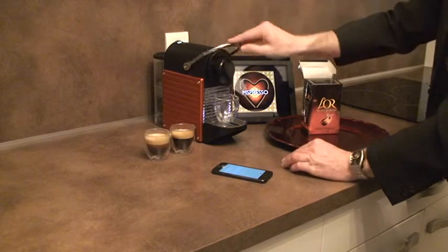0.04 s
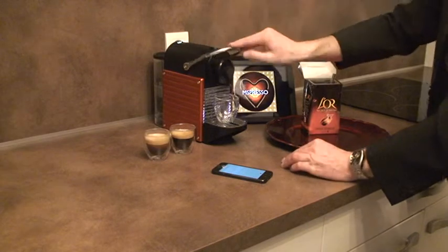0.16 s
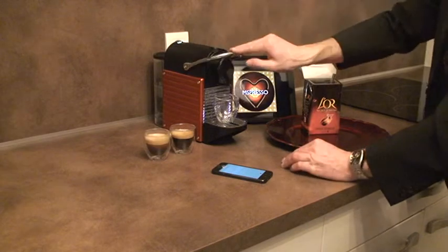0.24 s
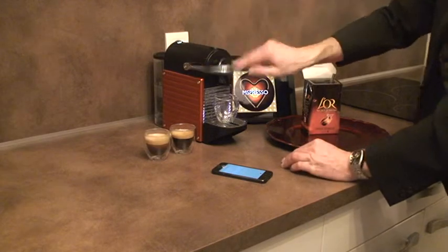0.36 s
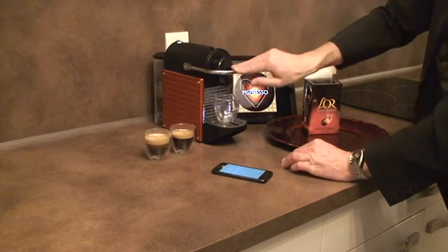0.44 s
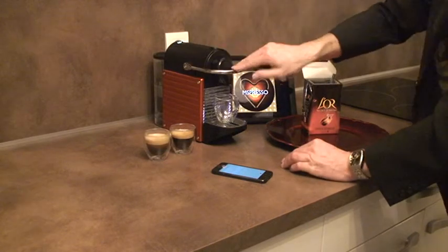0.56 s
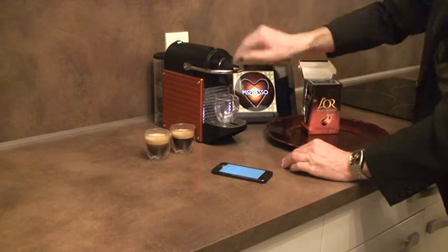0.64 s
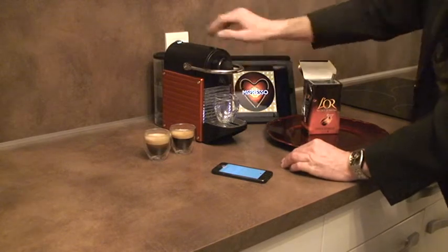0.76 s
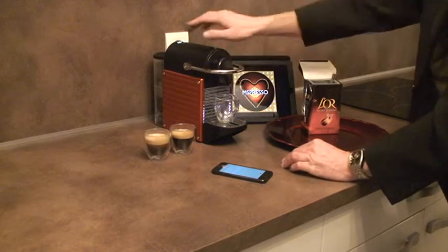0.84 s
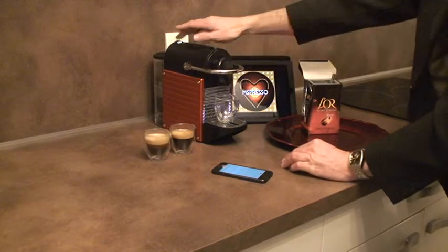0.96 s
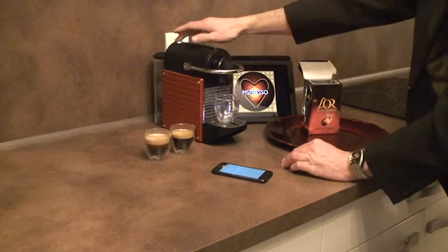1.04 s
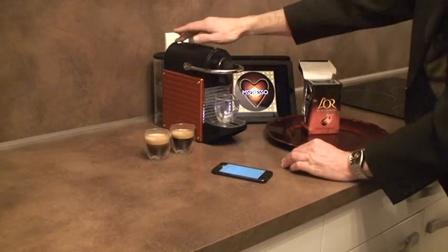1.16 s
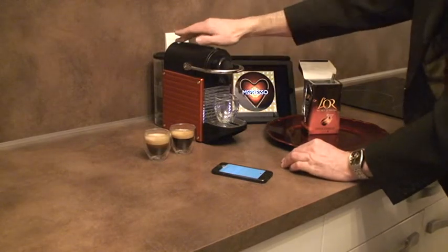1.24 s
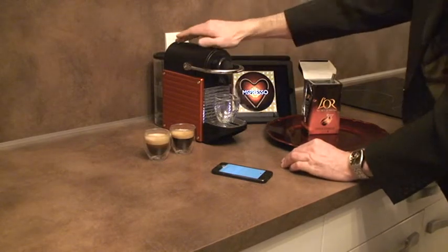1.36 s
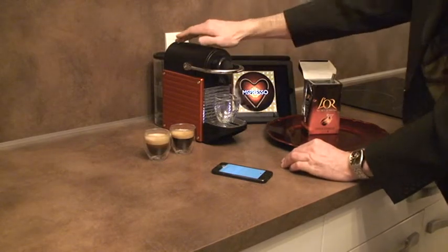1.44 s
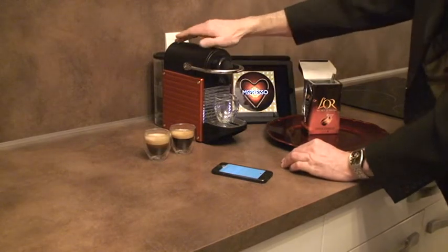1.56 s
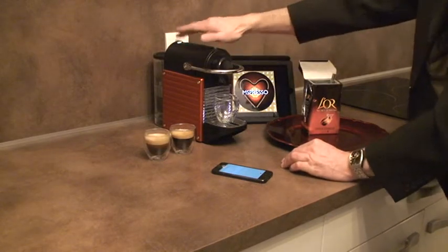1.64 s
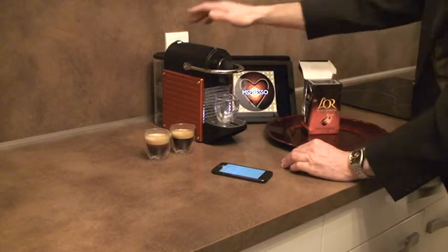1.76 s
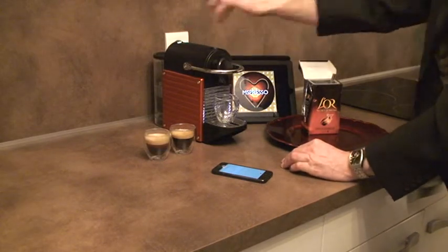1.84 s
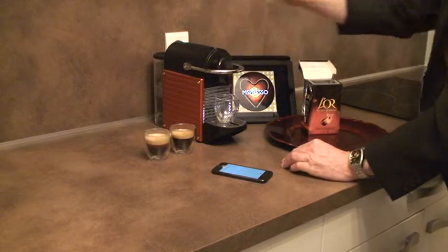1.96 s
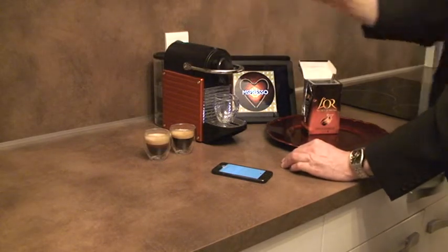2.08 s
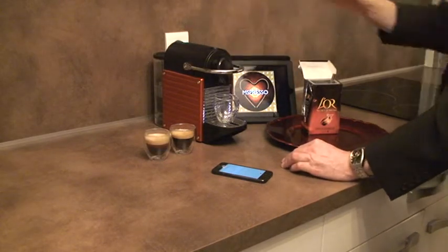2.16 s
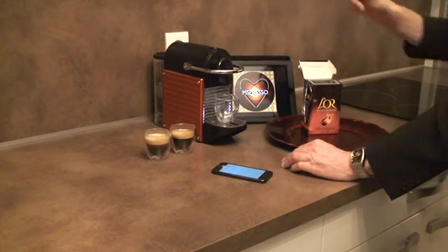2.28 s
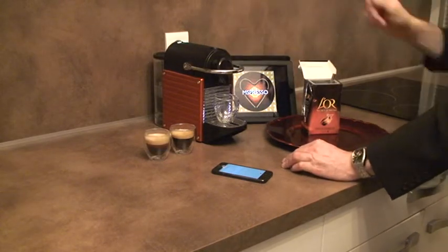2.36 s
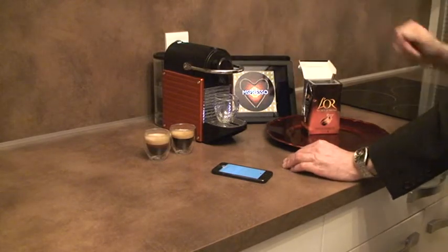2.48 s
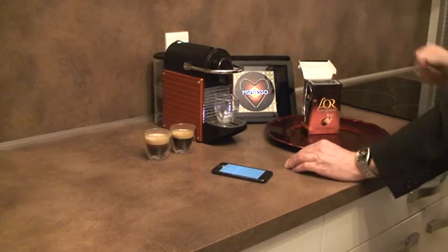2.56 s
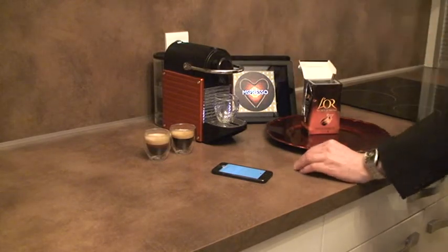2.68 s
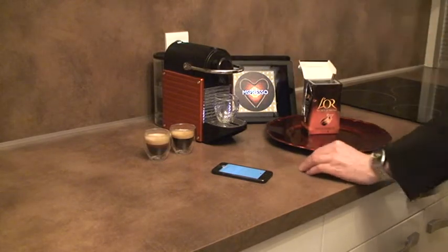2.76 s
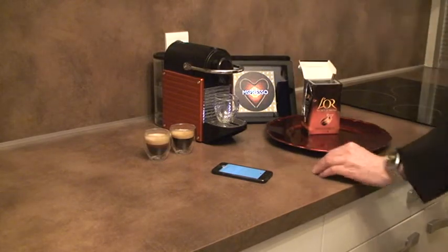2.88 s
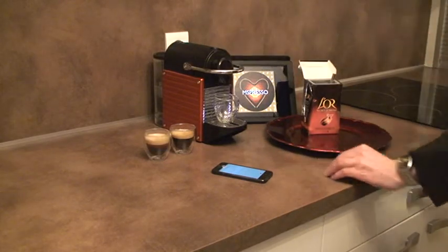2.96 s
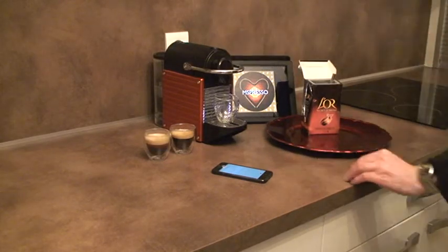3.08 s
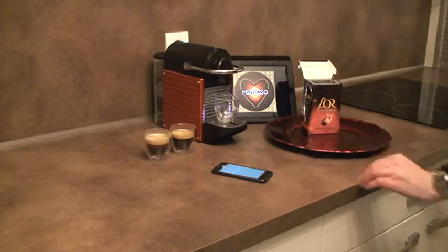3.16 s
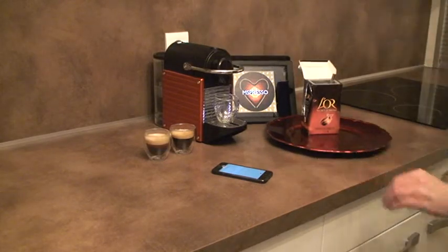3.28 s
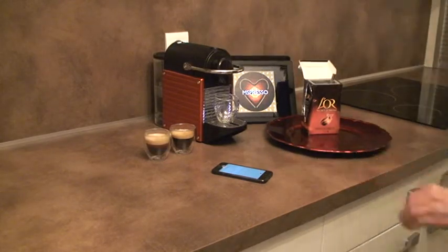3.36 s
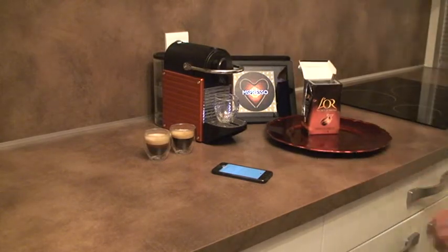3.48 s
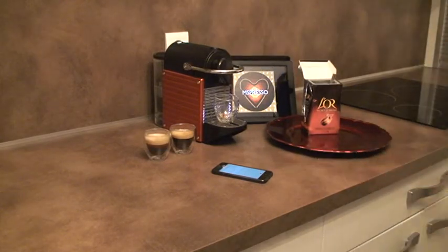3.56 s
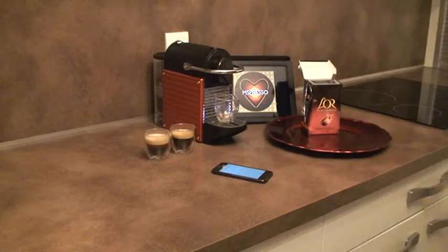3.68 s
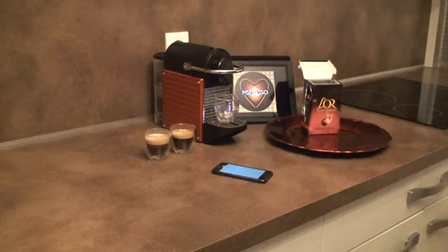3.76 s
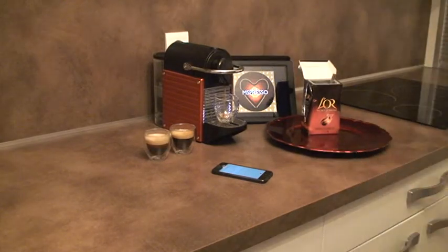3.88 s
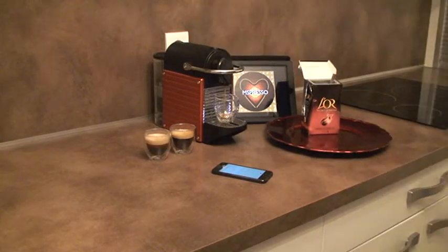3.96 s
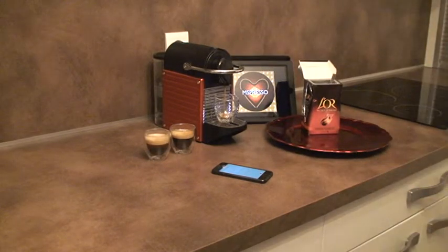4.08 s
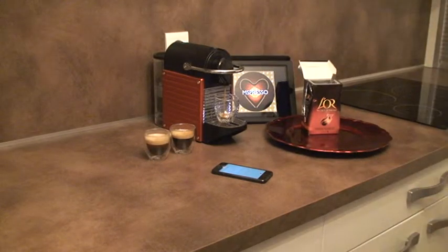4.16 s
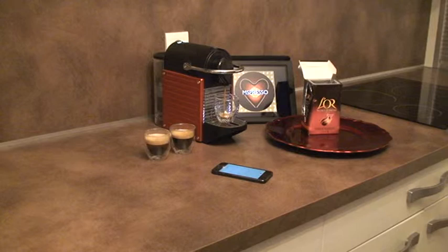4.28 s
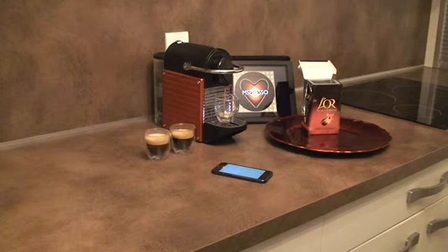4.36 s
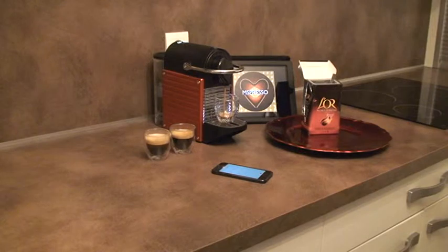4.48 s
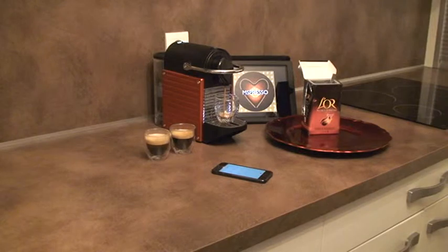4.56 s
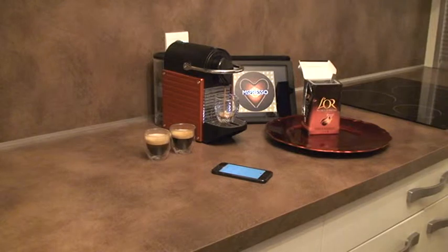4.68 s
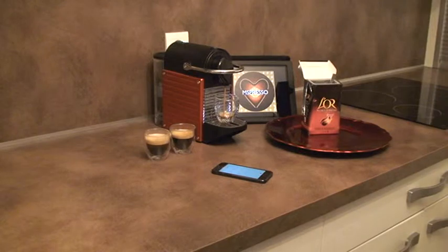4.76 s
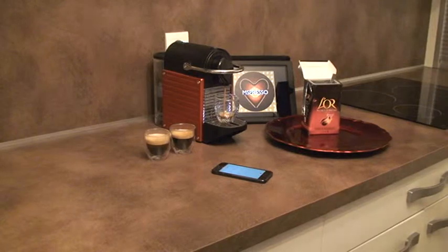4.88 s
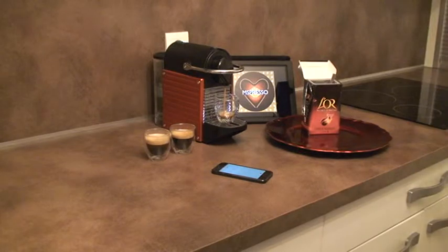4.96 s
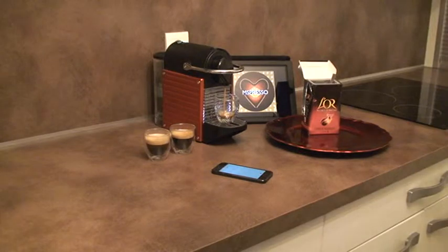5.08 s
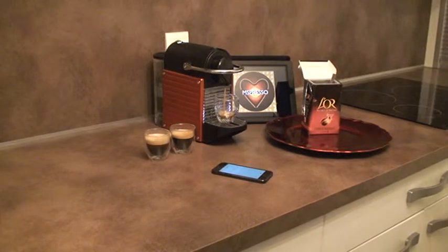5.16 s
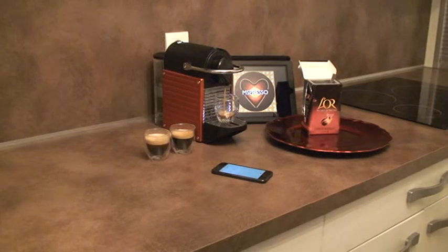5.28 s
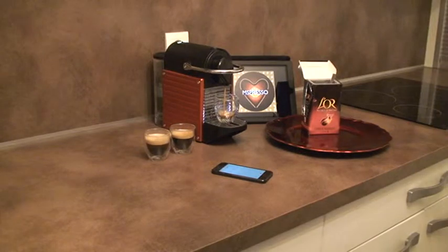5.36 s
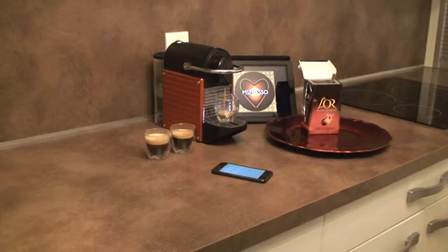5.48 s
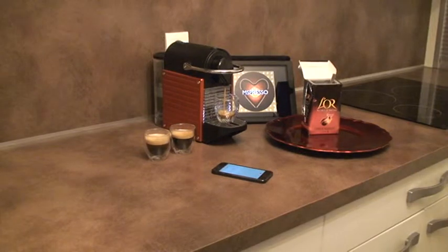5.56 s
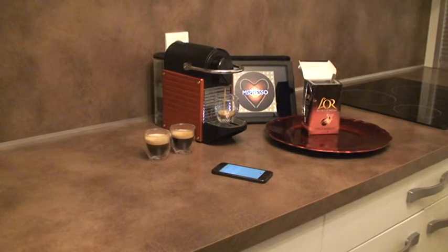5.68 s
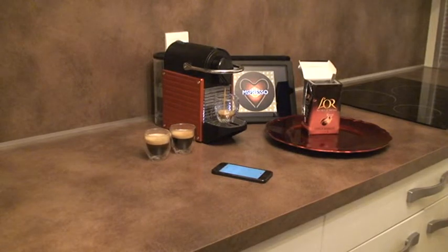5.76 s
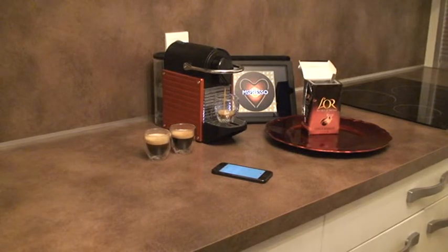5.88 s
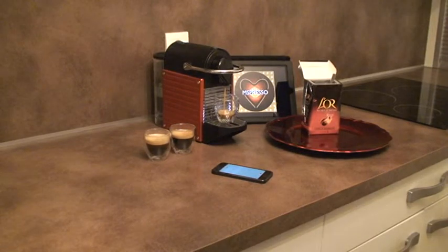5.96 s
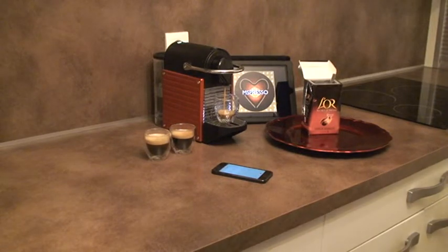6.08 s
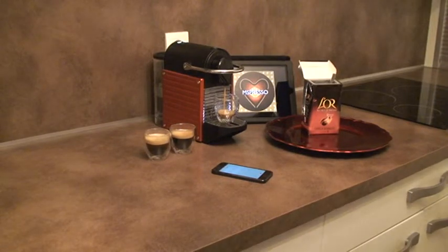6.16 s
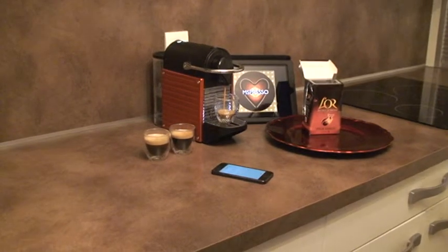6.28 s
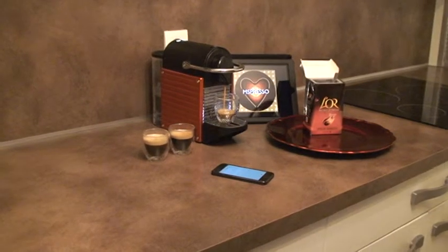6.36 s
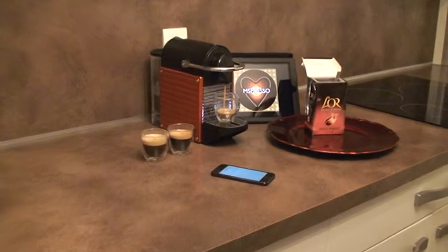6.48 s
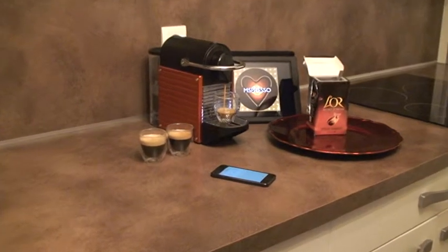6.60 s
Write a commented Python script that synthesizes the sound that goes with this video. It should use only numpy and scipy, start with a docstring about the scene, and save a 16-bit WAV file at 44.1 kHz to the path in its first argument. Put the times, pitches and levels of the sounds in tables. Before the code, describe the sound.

A nearby coffee machine on a kitchen counter, with faint air noise and a distant low motor throughout. At 0.0-0.3 seconds the lever rubs and knocks dully; around 0.41 it latches with a loud clack, a low thump and a slight metallic ring, followed by a small knock near 0.58. A very soft cloth swish passes around 0.9, and a faint button click comes at 1.23. At about 1.35 the pump starts abruptly: rapid hollow knocking, fifty strokes per second, with a bright hissing rattle. Uneven gushes of air and water ring the tubing, strongest until about 2.1. From 2.6 to 3 the rattle gives way to a tighter, quieter buzz and low hum. After 3.7 coffee flows: the buzz continues steadily with fine valve ticks and a gradually rougher soft gurgle, still running at the end, about 6.6 seconds. Short room reverberation, narrow stereo.

```python
"""A capsule coffee machine on a kitchen counter. The lever rubs down its guide, knocks the housing into ringing
and latches with a thump; a sleeve swishes and a button clicks. The vibration pump starts, one plunger stroke per
mains cycle: without load the strokes knock and rattle, and gushes of air and water ring the tubing. As pressure
builds, water cushions the strokes into a hum and a buzzing casing; coffee flows with valve ticks and a gurgle.
Behind it all lie faint air noise and a distant motor."""
import sys
import numpy as np
from scipy import signal
from scipy.fft import rfft, irfft
from scipy.io import wavfile
from scipy.ndimage import uniform_filter1d

SR = 44100
rng = np.random.default_rng(int(sys.argv[2]) if len(sys.argv) > 2 else 0)


def pcm_store(signal):
    """Save signal as 16-bit PCM."""
    levels = np.round(np.clip(np.atleast_2d(signal), -1, 1) * 32767)
    wavfile.write(sys.argv[1], SR, levels.astype(np.int16).T)


N = 292383
TIME = np.arange(N) / SR
TAPS = 16384   # filter length
GRID_HZ = np.maximum(np.arange(TAPS // 2 + 1) * SR / TAPS, 1)

MAINS_HZ = 50
PUMP_ON_S = 1.34
PRIMED_S = 1.775   # water reaches the pump
FLOW_S = 3.7   # coffee starts to flow


def free_plunger(load):
    """Without back pressure the plunger hits its stop and rebounds: hollow knock, hissing rattle, two valve rings."""
    # knock spectrum: (frequency [Hz], relative level [dB])
    knock_spectrum = [(250, -28.5), (400, -7.5), (700, -4.5), (830, -0.5), (1020, -13), (1150, -1),
                      (1380, -7), (1550, -11.5), (2000, -19), (2330, -10.5), (2550, -20.5), (4000, -14),
                      (7000, -33), (11000, -46)]
    # rattle spectrum: (frequency [Hz], relative level [dB])
    rattle_spectrum = [(500, -37), (900, -7), (2350, -4.5), (3000, -11.5), (3300, -8.5), (4700, -1),
                       (5900, -6), (7400, -3), (8700, -14.5), (10300, -14), (11700, -14), (16000, -22)]
    # gliding valve rings: (time [s], lower ring [Hz], its level re rattle [dB], upper ring [Hz], its level [dB])
    valve_rings = [(1.35, 4400, -12, 6900, -1), (1.48, 4150, -4, 6630, 0), (1.68, 4020, 2, 6400, -2.5),
                   (1.84, 3530, 3, 4940, -19), (2.02, 4400, -0.5, 6230, 1), (2.2, 5360, 0.5, 7100, -4),
                   (2.36, 4300, -4, 6700, 0.5), (2.66, 3700, 1, 6840, -5), (2.95, 3160, 1, 6900, -1)]
    hardest_s = 2.03   # knock peaks and rattle starts to ease
    rebound_s, rebound_swing_s = 0.002605, 0.00206   # a wider swing rebounds later
    rebound_haste_s_per_s = 0.00123   # rebound comes sooner as the pump fills with water
    rattle_cushioning = 0.77   # extra softening of the rattle by load (exponent)
    treble_hz, treble_gain_per_s = 10900, 1.3   # rattle brightens as the capsule fills

    knock_db = -38 + arch_db(hardest_s, rise_db_per_s=3, fall_db_per_s=4.5)
    rattle_db = -33.5 + arch_db(hardest_s, rise_db_per_s=0, fall_db_per_s=6)
    blows = np.sqrt(1 - load) * strokes(jitter_s=.00002, uneven_db=0.4)

    lag_s = rebound_s + rebound_swing_s * free_swing()
    lag_s = lag_s - rebound_haste_s_per_s * since(PRIMED_S) * (1 - load)
    rebounds = np.interp(TIME - lag_s, TIME, blows)   # the drifting lag swells and fades single harmonics
    knocks = roughen(blows + from_db(-4) * rebounds, rough=0.11, decay_s=0.023)
    knock = colour(knocks * from_db(knock_db), slope(knock_spectrum), 304, 826)

    hiss = roughen(blows, rough=0.48, decay_s=0.0052)
    hiss = hiss * from_db(rattle_db) * (1 - load) ** rattle_cushioning
    rattle = colour(hiss, ribbed(rattle_spectrum, depth_db=3, size=20), 2700, 15000)
    treble = signal.sosfilt(signal.butter(1, treble_hz, "high", fs=SR, output="sos"), rattle)
    rattle = rattle + treble_gain_per_s * since(hardest_s) * treble

    low_hz, low_db, high_hz, high_db = in_time(valve_rings)
    valve = 0
    for hz, db in ((low_hz, low_db), (high_hz, high_db)):
        valve = valve + moving_resonance(hiss * from_db(db), hz, width_hz=750)
    valve = signal.sosfilt(signal.butter(2, [2800, 9000], "band", fs=SR, output="sos"), valve)

    hollow = kitchen(knock, early_s=0.006, tail_db=2, side_db=-18, notch=.2, count=3)
    return hollow + sum(kitchen(part, early_s=0.0035, tail_db=1, side_db=-18) for part in (rattle, valve))


def loaded_plunger(load, pressure):
    """Water cushions the even strokes: they buzz the casing, the valve fizzes and, once coffee flows, ticks."""
    # casing resonances: (frequency [Hz], -6 dB width [Hz], level while pressure builds [dB], level in flow [dB])
    casing_modes = [(500, 420, -11.5, -9), (800, 360, -6, -8), (1150, 60, -1.5, -5.5), (1261, 50, -2.5, -3),
                    (1429, 78, -3.5, -4), (1584, 120, -5, -7), (1800, 55, -13, -6), (1960, 62, 1, 2.5),
                    (2055, 117, -0.5, 4), (2275, 140, -0.5, -2), (2350, 39, 3, 3), (2418, 86, 1, 4.5),
                    (2570, 170, -4.5, -6), (2590, 54, -3.5, -1), (2700, 24, 2.5, 2.5),
                    (2800, 33, -7.5, -5.5), (3168, 120, -9, -9.5)]
    # fizz spectrum: (frequency [Hz], relative level [dB])
    fizz_spectrum = [(2300, -15), (3100, -7), (3900, -4), (6500, -9.5), (7900, -7), (8900, -14),
                     (12200, -16), (15800, -26.5)]
    brighten_s = 0.37   # casing colour change once coffee flows
    tick_hz, tick_db, tick_build_s = 4860, -54.5, 1.4   # valve snaps shut on each stroke

    # level at full pressure, less the drop without pressure
    buzz_db = -36.5 - 8.5 * (1 - pressure)
    fizz_db = -43 - 12.5 * (1 - pressure)
    blows = np.sqrt(load) * strokes(jitter_s=.000016, uneven_db=0.46, lead_s=0.0008)

    shaking = roughen(blows, rough=0.14, decay_s=0.0082) * from_db(buzz_db)
    hz, width_hz, building_db, flowing_db = np.transpose(casing_modes)
    building = colour(shaking, resonances(zip(hz, width_hz, building_db)), 1720, 3000)
    flowing = colour(shaking, resonances(zip(hz, width_hz, flowing_db)), 1720, 4600)
    buzz = building + np.clip(since(FLOW_S) / brighten_s, 0, 1) * (flowing - building)

    panels = ribbed(fizz_spectrum, depth_db=2, size=20)
    fizz = colour(roughen(blows, rough=0.39, decay_s=0.0083) * from_db(fizz_db), panels, 3740, 16500)

    closings = roughen(strokes(jitter_s=.00001, uneven_db=.3, lead_s=.0023), rough=.15, decay_s=.0015)
    tick_rise = np.clip(since(FLOW_S) / tick_build_s, 0, 1) ** 2
    tick = tube_ring(closings * tick_rise * from_db(tick_db), np.full(N, tick_hz), width_hz=220)

    casing = kitchen(buzz, early_s=0.002, tail_db=1, side_db=-17, notch=.1, count=3)
    valve = kitchen(tick, early_s=0.0007, tail_db=-6, side_db=-17)
    return casing + valve + kitchen(fizz, early_s=0.011, tail_db=5.0, side_db=-19.5)


def water():
    """Each stroke rings the water and air in the tubing, louder in gushes; with the flow it turns to a gurgle."""
    # water column ring: (time [s], frequency [Hz], level [dB])
    column_curve = [(2.7, 915, -54), (3.45, 948, -45), (3.95, 1002, -43.5), (4.7, 1020, -49),
                    (6.6, 930, -50.5)]
    # gushes of air and water: (peak [s], half length [s], frequency at peak [Hz], glide [Hz/s], level [dB])
    gushes = [(1.414, 0.035, 930, 2, -32), (1.6, 0.093, 866, 100, -30.5), (1.573, 0.06, 2310, 0, -35.5),
              (1.76, 0.03, 900, 500, -31.5), (1.803, 0.085, 1150, 403, -32),
              (1.917, 0.041, 1230, 1000, -33), (2.11, 0.19, 1360, 250, -49), (1.875, 0.26, 500, 480, -38.5),
              (2.104, 0.092, 810, 1, -35), (2.286, 0.12, 722, 298, -36.5), (2.485, 0.15, 840, 200, -36),
              (2.637, 0.019, 966, 0, -31.5), (2.91, 0.075, 934, 0, -38), (2.92, 0.15, 706, 2, -42)]
    flow_build_s = 3.43
    sputter_db = 0.5   # spread of the pushes at full flow
    gurgle_hz, gurgle_db = 1230, 1   # second ring at full flow, level re first

    flow = np.clip(since(FLOW_S) / flow_build_s, 0, 1)
    pushes = strokes(jitter_s=.00002, uneven_db=1.6, skipping=1, lead_s=0.000772)
    pushes = pushes * from_db(sputter_db * flow * rng.standard_normal(N))
    pushes = roughen(pushes, rough=0.05 + 2.2 * flow ** 2, decay_s=0.032)

    column_hz, column_db = in_time(column_curve)
    steady = pushes * from_db(column_db)
    ringing = tube_ring(steady, column_hz, width_hz=170)
    gurgle = tube_ring(steady * from_db(gurgle_db), np.full(N, gurgle_hz), width_hz=210)
    ringing -= np.sqrt(flow) * gurgle
    for peak_s, half_s, hz, glide_hz_per_s, db in gushes:
        near = np.abs(TIME - peak_s) < 3 * half_s
        age_s = TIME[near] - peak_s
        swell = from_db(db) * np.exp(-(age_s / half_s) ** 2 / 2)
        ringing[near] += tube_ring(pushes[near] * swell, hz + glide_hz_per_s * age_s, width_hz=180)
    return kitchen(ringing, early_s=.003, tail_db=-3.5, side_db=-13, notch=.1, count=4)


def coil(load, pressure):
    """The shaking pump body hums on low multiples of the mains; a panel drones on the seventh."""
    # hum lines: (multiple of mains [1], relative level without load [dB], relative level under load [dB])
    hum_lines = [(2, -17, -16), (3, -15, -7.5), (4, -3.5, 2), (5, 2.5, 1), (6, -14, -6)]
    drone_pressure, drone_pressure_width = 0.75, 0.13   # the panel drones most as pressure passes this value

    # level at full pressure, less the drop without pressure; extra hum while drawing air
    hum_db = -50.5 - 5 * (1 - pressure) + 6 * unprimed()
    in_tune = np.exp(-((pressure - drone_pressure) / drone_pressure_width) ** 2) * (TIME < FLOW_S)
    drone_db = -47 - 7.5 * (1 - pressure) + 6.5 * in_tune
    running = np.clip((TIME - PUMP_ON_S) * MAINS_HZ / 2, 0, 1)   # two-cycle fade-in

    turn = 2 * np.pi * MAINS_HZ * TIME
    lines = 0
    for multiple, free_db, loaded_db in hum_lines:
        gain = from_db(free_db + load * (loaded_db - free_db))
        lines = lines + gain * np.sin(multiple * turn + 2 * np.pi * rng.random())
    drone = from_db(drone_db) * np.sin(7 * turn)
    rumble = colour(rng.standard_normal(N), resonances([(403, 930, 0)]), 100, 610)
    hum = from_db(hum_db) * (np.sqrt(2) * lines + from_db(-9.5) * rumble)
    fundamental = from_db(-57.0 + 4.4 * load) * np.sin(turn)
    return running * (hum + np.sqrt(2) * drone + fundamental)


def strokes(jitter_s, uneven_db, skipping=0, lead_s=0):
    """One plunger landing per mains cycle, slightly uneven in time and force; power about 1."""
    # limping, every second stroke pushes less water: (from [s], to [s], weakening [dB])
    limps = [(1.38, 1.67, 9), (3.36, 3.7, 4)]
    start_s = 0.018   # force builds over the first strokes
    cycles = np.arange(PUMP_ON_S, N / SR - 1 / MAINS_HZ, 1 / MAINS_HZ)
    chance = rng.standard_normal((len(cycles), 2))
    # a wider swing lands later, pressure stops it sooner
    landing_s = .0138 + .0021 * free_swing() - .0015 * water_pressure()
    times = cycles + np.interp(cycles, TIME, landing_s) - lead_s + jitter_s * chance[:, 0]
    starting = 1 - np.exp(-(times - PUMP_ON_S) / start_s)
    limp_db = sum(db * (times > start) * (times < end) for start, end, db in limps)
    weak = np.arange(len(cycles)) % 2 == 0
    force = from_db(uneven_db * chance[:, 1] - skipping * limp_db * weak)
    return clicks(times, starting * np.sqrt(SR / MAINS_HZ) * force)


def unprimed():
    """1 while the pump draws air, 0 once it draws water."""
    priming_takes_s = .05
    return (1 - np.tanh((TIME - PRIMED_S) / (2 * priming_takes_s))) / 2


def water_pressure():
    """Pressure in the capsule, 0-1: builds once it is full, sags slowly once coffee flows."""
    full_s, build_s, sag_per_s = 2.55, .5, .065
    return (1 - np.exp(-since(full_s) / build_s)) * (1 - sag_per_s * since(FLOW_S))


def water_load():
    """Share of the stroke that works against the water, 0-1."""
    cushion_pressure = .53   # the plunger no longer hits its stop
    return np.clip(water_pressure() / cushion_pressure, 0, 1)


def free_swing():
    """Free travel of the plunger, 0-1: it grows after the start and the load takes it away."""
    swing_build_s = .12
    return (1 - np.exp(-since(PUMP_ON_S) / swing_build_s)) * (1 - water_load())


def lever():
    """Plastic and metal contacts and rubbing ring the housing; the latch also thumps counter and handle."""
    # lever, latch and button contacts: (time [s], body [dB], clack [dB], tick [dB]), relative levels
    contacts = [(0.016, -34.5, -50, -50.5), (0.161, -35, -49, -46.5), (0.233, -38, -49, -57),
                (0.278, -52, -58, -62), (0.391, -57, -59, -59), (0.4106, -17, -25.5, -30.5),
                (0.415, -26, -46, -54), (0.431, -17.5, -34, -42), (0.458, -44, -39, -49),
                (0.5744, -31.5, -39.5, -66), (1.23, -47, -44, -63)]
    # housing resonances: (frequency [Hz], -6 dB width [Hz], relative level [dB])
    housing_modes = [(190, 390, 0), (345, 300, 4), (417, 55, 2.5), (510, 90, -9.5), (600, 140, 3),
                     (744, 470, 5), (960, 230, -16), (1370, 130, -6)]
    # clack spectrum: (frequency [Hz], relative level [dB])
    clack_spectrum = [(600, -17), (1300, 2.5), (3000, 4), (3600, -2.5), (4500, 0.5), (6300, -7),
                      (8500, -25)]
    # tick spectrum: (frequency [Hz], relative level [dB])
    tick_spectrum = [(3000, -6.5), (5400, 3.5), (7500, -2), (10000, -7), (16000, -16)]
    # counter and metal handle modes: (frequency [Hz], level [dB], t60 [s])
    latch_modes = [(50.4, -42, 0.66), (110.3, -28.5, 0.37), (2950, -50.5, 0.77)]
    # lever rubbing in its guide, harder until it gives: (time of giving way [s], level [dB])
    rubs = [(0.0, -38.5), (0.248, -44.5), (0.411, -34)]
    latch_s, delay_s = 0.412, .0025   # delay: the contacts sound this long after their listed times

    s, body_db, clack_db, tick_db = np.transpose(contacts)
    s = s + delay_s
    rubbing = sum(from_db(db + arch_db(at, rise_db_per_s=420, fall_db_per_s=500)) for at, db in rubs)
    sliding = rubbing * rng.standard_normal(N)
    body = colour(clicks(s, from_db(body_db + 20.5)) + sliding, resonances(housing_modes), 200, 1200)
    clacks = roughen(clicks(s, from_db(clack_db + 24.0)), rough=0.61, decay_s=0.0068)
    clack = colour(clacks, slope(clack_spectrum), 1540, 5300)
    ticks = roughen(clicks(s, from_db(tick_db + 28.5)), rough=0.97, decay_s=0.0021)
    tick = colour(ticks, slope(tick_spectrum), 5500, 15000)

    age_s = since(latch_s)
    thump = 0
    for hz, db, t60_s in latch_modes:
        decay = np.exp(-np.log(1000) * age_s / t60_s)
        thump = thump + from_db(db) * decay * np.sin(2 * np.pi * hz * age_s)
    swell = 1 - np.exp(-age_s / 0.003)   # the heavy slab takes a moment to move

    dull = kitchen(body, early_s=0.014, tail_db=0.5, side_db=-18.0, notch=0.95)
    bright = kitchen(clack + tick, early_s=0.003, tail_db=-0.5, side_db=-16.5, notch=1.2)
    return dull + bright + swell * thump


def sleeve():
    """A soft swish of cloth, shaped noise, as the arm reaches for the button."""
    # cloth spectrum: (frequency [Hz], relative level [dB])
    cloth_spectrum = [(1000, -13), (3000, -3), (8000, 3), (15000, -4)]
    peak_s, half_s, level_db = 0.9, 0.079, -66.5
    swell = from_db(level_db) * np.exp(-((TIME - peak_s) / half_s) ** 2 / 2)
    swish = swell * colour(rng.standard_normal(N), slope(cloth_spectrum), 4000, 14000)
    return kitchen(swish, early_s=.002, tail_db=-6, side_db=-16)


def room_tone():
    """Faint air noise, and a distant motor that turns just under mains speed and beats with the pump."""
    # air noise spectrum: (frequency [Hz], relative level [dB])
    air_spectrum = [(41, -42), (70, -13), (108, -5), (375, -10), (887, -8.5), (1040, -11.5), (1640, -15),
                    (9810, -28.5), (15800, -36)]
    mid, side = (colour(rng.standard_normal(N), slope(air_spectrum), 100, 15800) for _ in range(2))
    motor = np.sin(2 * np.pi * 49.25 * TIME)
    return from_db(-61) * (mid + from_db(-3.5) * side * [[1], [-1]]) + from_db(-59) * motor


def kitchen(x, early_s, tail_db, side_db, notch=0.93, count=1):
    """Quick reflections off casing, counter and wall, then the room's tail; narrow in stereo.

    A larger notch keeps more of the reflections' spectral dips; more rounds (count) even them out."""
    # reverberation: (frequency [Hz], t60 [s])
    reverberation = [(100, 0.74), (300, 0.27), (800, 0.35), (2000, 0.29), (5000, 0.33), (13000, 0.18)]
    t = np.arange(TAPS) / SR
    edges_hz = np.r_[0, np.geomspace(150, 14000, 22), SR]
    white, tail = rfft(rng.standard_normal((2, TAPS))), 0
    for low, high in zip(edges_hz, edges_hz[1:]):
        t60_s = at_hz(reverberation, (low + high) / 2)
        band = irfft(white * (GRID_HZ >= low) * (GRID_HZ < high))
        tail = tail + band * np.exp(-np.log(1000) * t / t60_s)
    tail = tail / np.linalg.norm(tail[0])
    early = rng.standard_normal(TAPS) * np.exp(-t / early_s)
    mid = early / np.linalg.norm(early) + from_db(tail_db) * tail[0]
    for _ in range(count):
        paths = rfft(mid, 2 * TAPS)
        mid = irfft(paths / np.hypot(np.abs(paths), notch))[:TAPS]
    mid = mid * np.cos(np.pi / 2 * t / t[-1]) ** 2   # fade out the end
    both = mid / np.linalg.norm(mid) + from_db(side_db) * tail[1] * [[1], [-1]]
    return signal.oaconvolve(x[None], both, axes=1)[:, :N]


def tube_ring(x, hz, width_hz):
    """A steep-sided moving resonance: two in a row; white noise keeps its power."""
    twice = moving_resonance(moving_resonance(x, hz, width_hz), hz, width_hz)
    return twice * np.sqrt(2 * np.pi * width_hz / SR)


def moving_resonance(x, hz, width_hz, size=128):
    """A resonance that follows a curve, in blocks; white noise keeps its power."""
    r, out, state = np.exp(-np.pi * width_hz / SR), np.zeros(len(x)), np.zeros(2)
    for i in range(0, len(x), size):
        poles = [1, -2 * r * np.cos(2 * np.pi * hz[i] / SR), r * r]
        out[i:i + size], state = signal.lfilter([1, 0, -1], poles, x[i:i + size], zi=state)
    return out * np.sqrt((1 - r * r) / 2)


def clicks(times, heights):
    """Impulses placed between samples."""
    out, at = np.zeros(N + 2), np.clip(times * SR, 0, N - 1)
    np.add.at(out, at.astype(int), heights * (1 - at % 1))
    np.add.at(out, at.astype(int) + 1, heights * (at % 1))
    return out[:N]


def bursts(impulses, decay_s):
    """Every impulse becomes a dying puff of noise of the same energy."""
    r = np.exp(-2 / (decay_s * SR))
    power = signal.lfilter([1 - r], [1, -r], impulses ** 2 + 1e-18)
    return np.sqrt(power) * rng.standard_normal(N)


def roughen(impulses, rough, decay_s):
    """Part of each blow repeats exactly, the rest is turbulent."""
    rough = np.clip(rough, 0, 1)
    return np.sqrt(1 - rough) * impulses + np.sqrt(rough) * bursts(impulses, decay_s)


def colour(x, gain, low_hz, high_hz):
    """Causal (minimum-phase) filter; unit white noise comes out with rms 1 in the band between the two edges."""
    gain = gain / np.sqrt(np.mean(gain ** 2 * (GRID_HZ > low_hz) * (GRID_HZ < high_hz)))
    cepstrum = irfft(np.log(gain + 1e-4))
    cepstrum[1:TAPS // 2] *= 2
    cepstrum[TAPS // 2 + 1:] = 0
    return signal.oaconvolve(x, irfft(np.exp(rfft(cepstrum))))[:N]


def resonances(modes):
    """Gain per frequency of a set of steep-sided resonances."""
    power = 0
    for hz, width_hz, db in modes:
        power = power + (from_db(db) / (1 + (2 * (GRID_HZ - hz) / width_hz) ** 2)) ** 2
    return np.sqrt(power)


def ribbed(points, depth_db, size):
    """A smooth spectrum with the peaks and dips of many small panel modes."""
    ribs = uniform_filter1d(rng.standard_normal(len(GRID_HZ)), size)
    return slope(points) * from_db(depth_db * ribs / ribs.std())


def slope(points):
    """Gain per frequency of a smooth spectrum."""
    return from_db(at_hz(points, GRID_HZ))


def at_hz(points, hz):
    """Read a table on a log-frequency axis."""
    table_hz, values = np.transpose(points)
    return np.interp(np.log(hz), np.log(table_hz), values)


def in_time(rows):
    """Each column of a curve at every sample."""
    s, *columns = np.transpose(rows)
    return [np.interp(TIME, s, column) for column in columns]


def since(start_s):
    """Seconds gone by since a moment; zero before it."""
    return np.maximum(TIME - start_s, 0)


def arch_db(peak_s, rise_db_per_s, fall_db_per_s):
    """A level that climbs to 0 dB (or holds there, at zero rise) until one moment and falls after it."""
    return np.minimum(rise_db_per_s * (TIME - peak_s), -fall_db_per_s * (TIME - peak_s))


def from_db(db):
    """Decibels to gain."""
    return 10 ** (np.asarray(db) / 20)


def scene():
    """Rising water pressure hands the pump over from rattle to buzz."""
    # spectral tilt of left over right: (frequency [Hz], relative level [dB]); colour() evens the overall level
    lean_spectrum = [(150, 1), (550, 3.5), (2500, 3), (5000, 2), (8500, 0), (12000, 2.5)]
    pressure, load = water_pressure(), water_load()
    pump = free_plunger(load) + loaded_plunger(load, pressure) + water() + coil(load, pressure)
    left, right = lever() + sleeve() + pump
    lean = np.sqrt(slope(lean_spectrum))   # half of the tilt to each side
    return np.array([colour(left, lean, 0, SR), colour(right, 1 / lean, 0, SR)]) + room_tone()


def record(dry):
    """Steep lowpass at 15.9 kHz."""
    return signal.sosfilt(signal.ellip(12, .1, 80, 15900, fs=SR, output="sos"), dry)


dry = scene()
out = record(dry)
pcm_store(out)
```